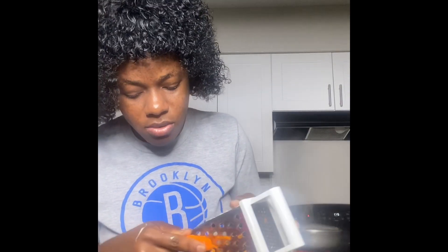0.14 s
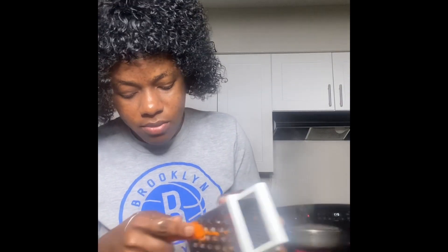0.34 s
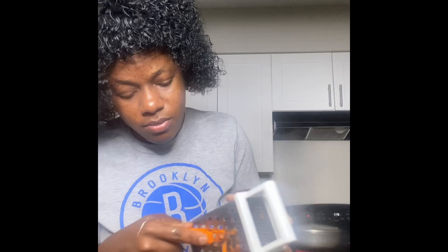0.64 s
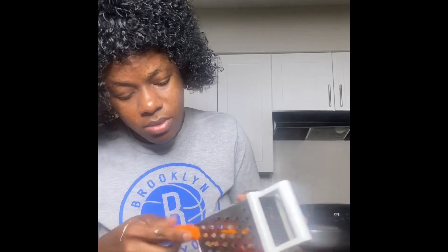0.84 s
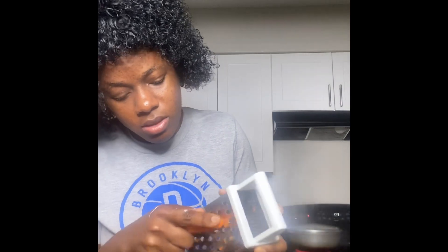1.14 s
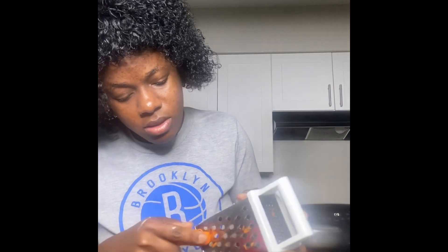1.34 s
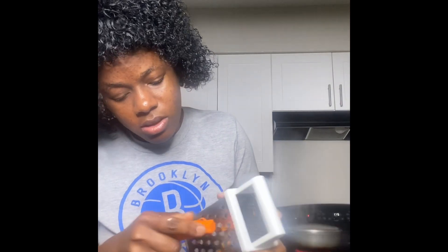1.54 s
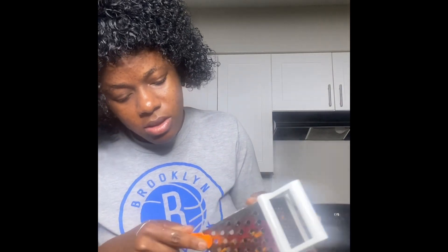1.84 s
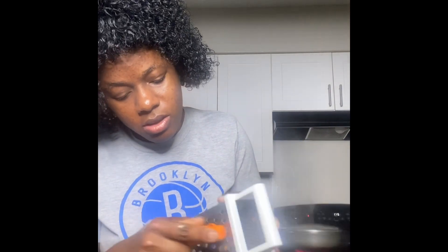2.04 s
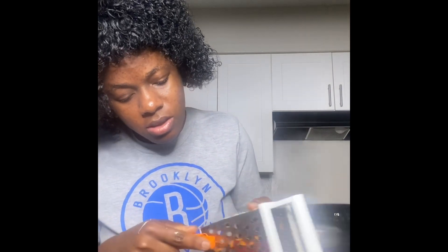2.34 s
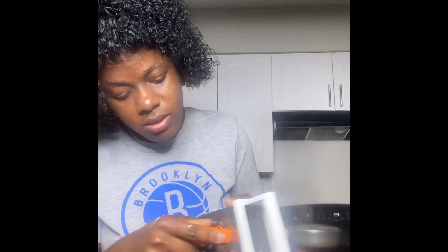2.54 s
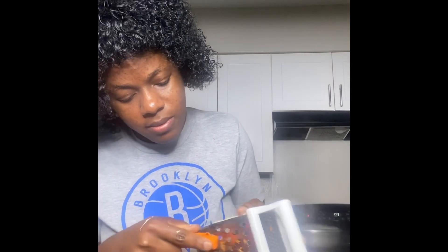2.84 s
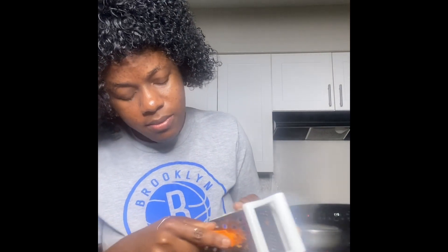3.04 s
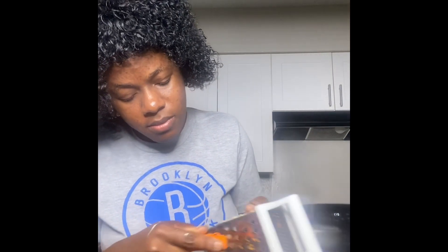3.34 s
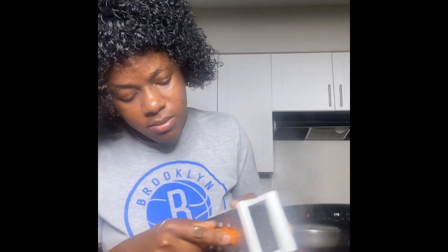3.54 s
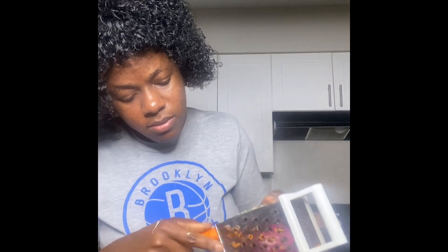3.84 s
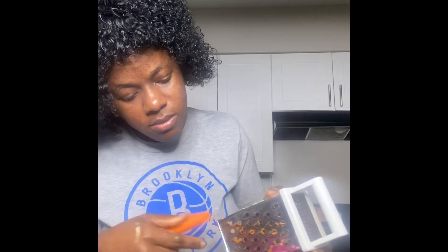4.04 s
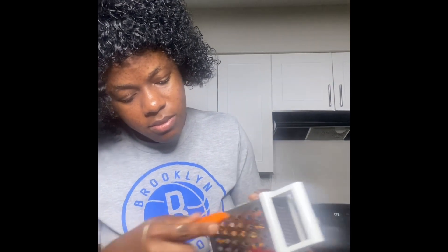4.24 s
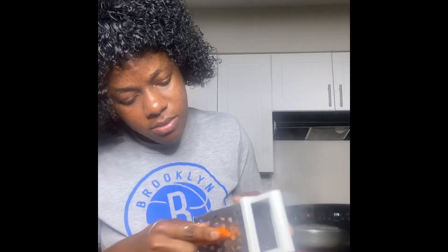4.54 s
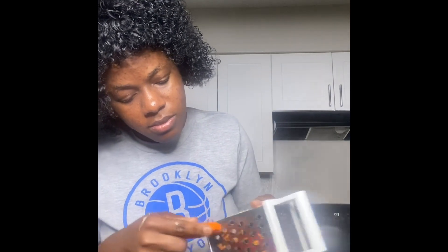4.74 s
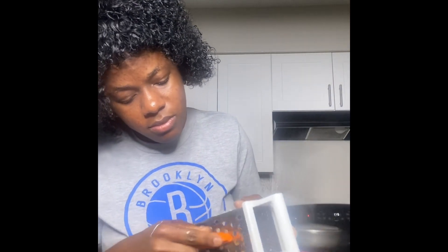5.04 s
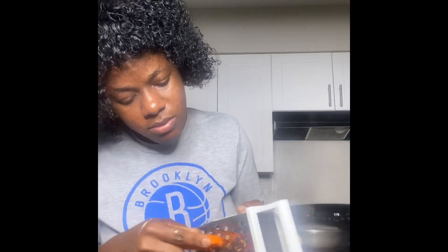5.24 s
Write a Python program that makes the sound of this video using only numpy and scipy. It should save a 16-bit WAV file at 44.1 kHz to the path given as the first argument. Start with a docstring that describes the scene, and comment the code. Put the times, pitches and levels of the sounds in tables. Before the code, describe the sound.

A carrot is grated in uneven, crisp scraping strokes on a lightly ringing sheet-metal box, with small clunks and faint appliance hum behind.

```python
"""A carrot is pushed in quick strokes over a sheet-metal box grater in a home kitchen, close to a phone.
The rasp is a dense rain of random fibre snaps, heard bare and through the ringing modes of the grater's panels.
Carrot and grater knock as strokes are set up: swelling bursts of the same modes, each with a crack of noise.
An appliance hums (noise in narrow resonances) and an extractor hisses softly behind (coloured noise).
The room adds a short noise tail, and the phone's two ports hear partly shared sound."""
import sys
import numpy as np
from scipy import signal
from scipy.fft import rfft, irfft, next_fast_len
from scipy.io import wavfile

SR = 44100
rng = np.random.default_rng(int(sys.argv[2]) if len(sys.argv) > 2 else 0)


def waveform_to_disk(signal):
    """Save audio, clipped to [-1, 1], as 16-bit WAV at the path in sys.argv[1]."""
    frames = np.transpose(np.atleast_2d(signal))
    scaled = np.clip(frames, -1, 1) * 32767
    samples = np.round(scaled).astype(np.int16)
    wavfile.write(sys.argv[1], SR, samples)


N = 237670   # length in samples

# Modes of the grater's panels, rung by rasp and knocks alike.
# Each row: frequency in Hz, relative level in dB, longest ring time in seconds per 60 dB.
PANEL_MODES = [(348.3, -4.5, 0.18), (385, -7, 0.11), (543, -6.5, 0.2), (664, 5, 0.017), (716, 2, 0.048),
               (757, -7, 0.032), (947, 1, 0.064), (961, -25.5, 0.087), (1214, 0, 0.061), (1460, 2, 0.1),
               (1570, 4, 0.067), (1690, -1, 0.051), (1910, -13.5, 0.099), (2064, 5, 0.026),
               (2593, -9, 0.12), (3066, 0.5, 0.075), (3470, -3.5, 0.047), (3900, -8, 0.018),
               (5240, -12, 0.075), (7900, -32, 0.09), (8420, -26.5, 0.09)]


def rasp():
    """Fibres snap at random, alike in size and of either sign; each is heard bare and through the panel modes."""
    # Colour of the tearing fibres. Each row: frequency in Hz, relative gain in dB.
    tear_spectrum = [(200, -138), (450, -32), (800, 5), (1500, 5.5), (3000, 8), (5000, 7), (7000, 0.5),
                     (9000, 1), (12000, -3.5), (15500, -10)]
    # Bands of the rasp whose loudness wanders independently. Each row: low edge in Hz, high edge in Hz.
    patch_bands = [(450, 1830), (1100, 7100), (2200, 4300)]
    snaps_per_s = 14000
    pressed_hz = 519   # while the carrot presses on the sheet, modes below this are held back

    rasp_db, pressure_db, fizz_db = strokes()
    signs = rng.choice([-1, 1], N)
    snaps = rms_one(signs * (rng.random(N) < snaps_per_s / SR))
    snaps = snaps * from_db(rasp_db + 1.55 * drift(47))   # rows of teeth bite unevenly
    bare = coloured(snaps, tear_spectrum)
    treble = filtered(bare, 2, 6000, "high")

    panels = 0
    for hz, level_db, t60 in PANEL_MODES:
        t60 = gripped(hz, t60)
        wander_db = 4 * np.clip(drift(14), -2, 1.5)   # the contact wanders over the panels
        push_db = pressure_db * min(900 / hz, 1)   # pressure acts most on the low modes
        drive = from_db(level_db - 7 + wander_db + push_db)
        # longer rings gather more snaps, so they are scaled down
        panels = panels + ring(snaps * drive, hz, t60) / np.sqrt(t60 * SR / 28)
    panels = filtered(panels, 2, pressed_hz, "high")

    patchy = 0
    for band_hz in patch_bands:
        patch = filtered(bare, 1, band_hz, "band")
        patchy = patchy + patch * (from_db(2.22 * drift(34.7)) - 1)
    fizz = treble * (from_db(fizz_db) - 1)
    return bare + patchy + fizz + panels * 0.27


def strokes():
    """Touch, bite, push, follow-through, lift and trail of every stroke: level, pressure and fizz in dB."""
    # Each row: moment the teeth bite in seconds, length of the light touch before it in ms (landing and
    # bite set the minimum), level of the touch in dB, level at the bite in dB, push in ms, level after the
    # push in dB, follow-through in ms, level at lift-off in dB, pressure in dB (drive of the low panel
    # modes), wet fizz of the treble in dB. Levels are those of the bare snaps before colouring.
    stroke_table = [(0.001, 5, -57, -44, 58, -56.5, 38, -49.5, 3, 2.5),
                    (0.414, 33.5, -56.5, -47, 14, -42, 4.4, -42, -0.5, -1.5),
                    (.462, 5, -75, -40, 42, -34.5, 4.9, -39, -2, 7.5),
                    (0.528, 5.5, -62, -41, 103, -48, 8.3, -43.5, -5.5, 3.5),
                    (1.056, 5, -78, -45.5, 135, -33, 19, -46, -9, 3),
                    (1.571, 43, -62.5, -50.5, 44, -36, 72, -32, -2, 3),
                    (2.031, 39.6, -50, -42.5, 46.7, -32.5, 42, -39, -4, 3.5),
                    (2.213, 5, -64, -50, 21, -37, 11.5, -41, -7, 2),
                    (2.489, 39, -57.5, -38.5, 69, -34, 69, -44, -4.5, 3),
                    (2.925, 40, -61, -49.5, 23, -37, 143, -36.5, -3, 4),
                    (3.413, 54, -53, -46, 21.6, -34, 9.2, -39, -4, 2),
                    (3.514, 5, -71, -44.5, 42, -31, 34.6, -32.5, -1.5, 3),
                    (4.327, 49.8, -53.5, -42.5, 44.5, -37.5, 24, -40.5, -4.5, 3.5),
                    (4.486, 5.4, -62, -42.5, 25.7, -35, 55, -42, -2, 3.5),
                    (4.862, 35.4, -56, -43, 34, -40, 140, -37.5, -5.5, 3),
                    (5.347, 26, -59, -50.5, 27, -42.5, 30, -44, 1.5, 3)]
    land_ms, bite_ms = 3.4, 14.7   # the touch starts, the teeth take hold
    lift_ms, lift_db = 44, -20   # the carrot lifts off
    trail_ms, trail_db = 107, -29.5   # shreds trail behind, then die out in the same time again
    touch_pressure_db, touch_fizz_db = 10.5, -5   # a light touch is duller
    handling_db, handling_pressure_db = -75.5, 5.5   # the held grater rustles faintly between strokes

    now_ms = np.arange(N) * 1000 / SR
    gain = np.full(N, from_db(handling_db))
    pressure, fizz = gain * handling_pressure_db, gain * 0
    for (s, touch_ms, touch_db, bite_db, push_ms, push_db,
         follow_ms, lift_off_db, pressure_db, fizz_db) in stroke_table:
        hold_ms = max(touch_ms - bite_ms - land_ms, 0)
        steps = np.array([0, land_ms, hold_ms, bite_ms, push_ms, follow_ms, lift_ms, trail_ms, trail_ms])
        times = s * 1000 - steps[:4].sum() + np.cumsum(steps)
        lifted_db = lift_off_db + lift_db
        levels = [-120, touch_db, touch_db, bite_db, push_db, lift_off_db, lifted_db, lifted_db + trail_db, -120]
        one = from_db(np.interp(now_ms, times, levels))
        touching = np.interp(now_ms, times[2:4], [1, 0])
        gain = gain + one
        pressure = pressure + one * (pressure_db + touching * touch_pressure_db)
        fizz = fizz + one * (fizz_db + touching * touch_fizz_db)
    # pressure and fizz are averages weighted by gain, so louder strokes count more
    return 20 * np.log10(gain), pressure / gain, fizz / gain


def knocks():
    """A soft contact swells the modes near its pitch region; a short crack of noise comes with it."""
    # Each row: start in seconds, level in dB, pitch region struck in Hz, spread in octaves (at least 0.1),
    # contact rise in ms, relative level of the crack in dB.
    knock_table = [(.385, -31, 703, 0.16, 3.1, -6), (.422, -41.5, 1490, 0.52, 2.2, -2),
                   (.431, -37, 1600, 0.38, 1.3, 5), (.469, -30, 3100, 0.28, 0.91, 11),
                   (.488, -34, 744, 0.21, 3.3, -10), (.553, -37, 2930, .12, 3, -10),
                   (.847, -14.5, 790, 0.12, 2.35, -5), (.851, -23.5, 394, 0.65, 3.5, -1.5),
                   (.88, -33, 820, 0.42, 2.9, -12), (.894, -31, 875, 0.42, 4, 1),
                   (1.003, -40.5, 724, 0.67, 1.25, -1), (1.053, -37, 2250, 0.46, 1.2, 5),
                   (1.354, -31, 418.9, 0.35, 7.2, -20), (1.425, -22, 2020, 0.19, 2, -1),
                   (1.534, -28, 782, 0.15, 1.9, -13), (1.536, -30.5, 1740, 0.31, 1.1, -10),
                   (1.997, -47, 637, 0.55, 2.1, 16), (2.452, -47, 690, 0.098, 1.5, 1),
                   (2.892, -59, 1170, 0.77, 1.4, 0), (2.923, -38, 1570, 0.27, 1.5, -4),
                   (3.363, -38.5, 540, 0.49, 1.4, -7), (3.368, -25, 434, 0.52, 2.5, -2),
                   (3.819, -48, 1573, 0.54, 1.4, 4), (3.845, -43, 7040, 0.26, 1.9, 3),
                   (3.881, -59, 1800, 0.77, 1.3, 6), (4.288, -51, 700, 0.43, 2, 8),
                   (4.701, -44, 2350, 0.6, 1.1, 4), (4.837, -50.5, 992, 0.97, 1.25, 0),
                   (4.86, -47.5, 980, 0.25, 1.5, 8), (5.317, -36.5, 700, .15, 3.3, -7)]
    free_below_hz, damping_slope = 450, .4   # the hand leaves higher knocks less of their ring time
    crack_top_hz, crack_t60_s = 3320, .02   # a carrot is too soft to excite more, unless struck high up

    hz, level_db, t60 = np.array(PANEL_MODES).T[:, :, None]
    age, out = np.arange(4096) / SR, np.zeros(N + 4096)
    for s, knock_db, region_hz, spread, rise_ms, crack_db in knock_table:
        turn, luck = rng.random((2, len(PANEL_MODES), 1))   # start phase and level of each mode
        near = np.exp(-.5 * (np.log2(hz / region_hz) / max(spread, .1)) ** 2)
        damping = np.clip((free_below_hz / region_hz) ** damping_slope, .1, 1)
        decay = fade(age, gripped(hz, t60) * damping)
        sines = np.sin(2 * np.pi * (hz * age + turn))
        modes = from_db(level_db + 2.5 * luck) * near * decay * sines
        crack_band = [region_hz, max(crack_top_hz, region_hz * 1.4)]
        hiss = filtered(rng.standard_normal(4096), 3, crack_band, "band")
        crack = from_db(crack_db) * hiss * fade(age, crack_t60_s)
        swell = 1 - np.exp(-(age * 1000 / rise_ms) ** 2)
        at = round(s * SR)
        out[at:at + 4096] += from_db(knock_db) * swell * (modes.sum(axis=0) + crack * 3)
    return out[:N]


def gripped(hz, t60):
    """Ring time of a mode on the held grater: the gripping hand allows at most 0.1 s and 70 cycles."""
    return np.minimum(t60, np.minimum(.1, 70 / hz))


def kitchen(torn, struck):
    """One pick-up gets the direct sound, the other a scattered copy; both get a noise tail dying band by band."""
    # Decay of the room. Each row: frequency in Hz, time to fall by 60 dB in seconds.
    room_decay = [(300, 0.62), (1500, 0.57), (6000, 0.5), (12000, 0.36)]
    # Lags of the all-pass chain that makes the second pick-up less like the first. Each entry: lag in ms.
    scatter_lags = [1.3, 2.9, 4.7, 7.9]
    room_db = -10
    knock_echo_db = -2.5   # the damped knocks send less into the room than the rasp
    # share of a knock's power that reaches the second pick-up unscattered, and its delay
    knock_crisp, knock_lag_s = .75, .00018

    age, tail = np.arange(SR // 2) / SR, 0
    edges = 120 * 2.0 ** np.arange(8)   # octave bands from 120 Hz
    for low, high in zip(edges, edges[1:]):
        band = filtered(rng.standard_normal((2, len(age))), 2, [low, high], "band")
        tail = tail + band * fade(age, at_hz(room_decay, np.sqrt(low * high)))
    tail = tail * np.minimum(age / 0.0013, 1)   # the tail builds up over 1.3 ms
    response = from_db(room_db) * tail / np.linalg.norm(tail, axis=1, keepdims=True)

    scatter = signal.unit_impulse(len(age))
    for lag_ms in scatter_lags:   # all-passes smear the sound without colouring it
        loop = signal.unit_impulse(round(lag_ms * SR / 1000) + 1)
        loop[-1] = 0.55
        scatter = signal.lfilter(loop[::-1], loop, scatter)

    near = torn + struck
    smeared = signal.fftconvolve(torn + np.sqrt(1 - knock_crisp) * struck, scatter)[:N]
    crisp = np.sqrt(knock_crisp) * np.roll(struck, round(knock_lag_s * SR))
    direct = np.array([near, smeared + crisp])
    echoed = torn + from_db(knock_echo_db) * struck
    return direct + signal.fftconvolve(echoed[None], response, axes=1)[:, :N]


def background():
    """Soft hiss and rumble as coloured noise, with the appliance's hum as noise in narrow resonances."""
    # Colour of hiss and rumble. Each row: frequency in Hz, relative gain in dB.
    hiss_spectrum = [(22, -74), (38, -16), (59, 2.5), (88, -25.5), (200, -17), (270, -20.5), (700, -39),
                     (1000, -22.5), (1300, -39.5), (5000, -43.5), (9000, -45.5), (15500, -57)]
    # Resonances of the hum. Each row: frequency in Hz, width in Hz, rms level ahead of the ports in dB.
    hum_bands = [(60.4, 5.2, -60), (112, 12.4, -60.5), (168.8, 27, -61.5), (211.3, 23, -68),
                 (1054, 24, -74)]

    sound = from_db(-55) * rms_one(coloured(rng.standard_normal((2, N)), hiss_spectrum))
    for hz, width_hz, level_db in hum_bands:
        t60 = np.log(1000) / np.pi / width_hz   # a narrow resonance rings long
        hum = ring(rng.standard_normal((2, N)), hz, t60)
        sound = sound + from_db(level_db) * rms_one(hum)
    return sound


def from_db(db):
    """Gain of a level."""
    return 10 ** (np.asarray(db) / 20)


def rms_one(x):
    """Scale to rms 1."""
    return x / np.sqrt(np.mean(x ** 2) + 1e-20)


def at_hz(points, hz, column=1):
    """Read a table along log frequency."""
    points = np.array(points)
    return np.interp(np.log(np.maximum(hz, 1)), np.log(points[:, 0]), points[:, column])


def filtered(x, order, hz, kind):
    """Butterworth filter."""
    return signal.sosfilt(signal.butter(order, hz, kind, fs=SR, output="sos"), x)


def coloured(x, spectrum):
    """Give a signal a spectrum; beyond the table's ends the gain stays flat."""
    size = next_fast_len(x.shape[-1])
    gain = from_db(at_hz(spectrum, np.fft.rfftfreq(size, 1 / SR)))
    return irfft(rfft(x, size) * gain, size)[..., :x.shape[-1]]


def drift(rate):
    """Slow chance with spread 1: noise through two equal one-pole low-passes at the rate in Hz."""
    r = np.exp(-2 * np.pi * rate / SR)
    slow = signal.lfilter([1], [1, -2 * r, r * r], rng.standard_normal(N + SR))[SR:]   # settled after 1 s
    return rms_one(slow)


def fade(age, t60):
    """Falls by 60 dB in t60."""
    return from_db(-60 * age / t60)


def ring(clicks, hz, t60):
    """Two-pole resonator: a unit click sets a dying sine of height 1 ringing."""
    r, w = fade(1 / SR, t60), 2 * np.pi * hz / SR
    return signal.lfilter([0, np.sin(w)], [1, -2 * r * np.cos(w), r * r], clicks + 1e-18)


def scene():
    """Two pick-ups of the same kitchen."""
    return kitchen(rasp(), knocks()) + background()


def record(dry):
    """The right port shares part of the left one's sound, turned in phase by the phone's body; the top is cut."""
    # The two ports. Each row: frequency in Hz, share of the left port's sound in the right one (0 to 1,
    # held to at most 0.995), gain of left over right in dB.
    port_table = [(38.6, 0.99, -2.5), (128, .94, 2), (280, 0.83, 3), (620, 0.33, 6), (1330, 0.67, 0.5),
                  (2580, 0.044, 3), (4700, 0.7, 3.5), (6100, 0.057, 4.5), (8440, 1, 1)]
    # Phase around the phone's body. Each row: frequency in Hz, lead of the left port in radians.
    lead_table = [(40, 0), (300, .3), (700, -.4), (1400, 2.2), (2300, 2.5), (4400, 2.2), (6400, 1.9),
                  (7500, 0)]
    in_step_hz, treble_lag_s = 7900, .000198   # above the first, only the path between the ports counts

    size = next_fast_len(N + 4096)
    hz = np.fft.rfftfreq(size, 1 / SR)
    share = np.clip(at_hz(port_table, hz), 0, .995)
    balance_db = at_hz(port_table, hz, column=2)
    lead = at_hz(lead_table, hz) + 2 * np.pi * np.maximum(hz - in_step_hz, 0) * treble_lag_s
    left, own = rfft(dry, size)
    right = share * np.exp(-1j * lead) * left + np.sqrt(1 - share ** 2) * own
    spectra = np.array([left * from_db(balance_db / 2), right * from_db(-balance_db / 2)])
    ports = irfft(spectra, size)[:, :N]
    ports = filtered(ports, 3, 42, "high")   # rumble filter
    return signal.sosfilt(signal.ellip(14, .5, 90, 15600, fs=SR, output="sos"), ports)   # steep treble cut


dry = scene()
out = record(dry)
waveform_to_disk(out)
```